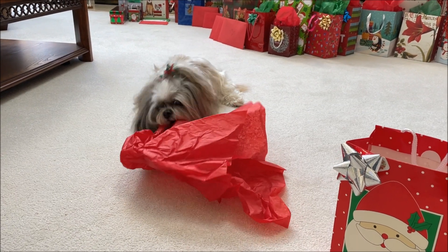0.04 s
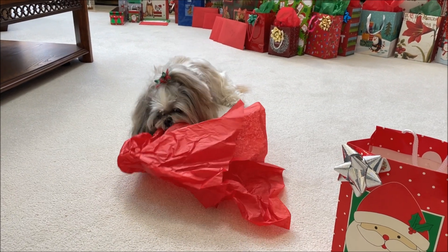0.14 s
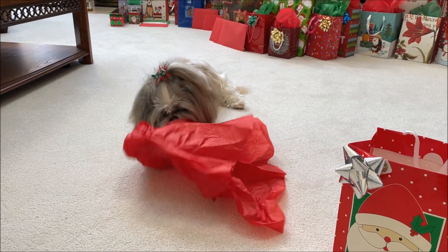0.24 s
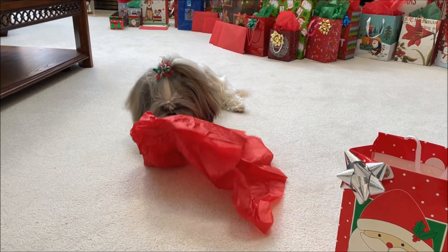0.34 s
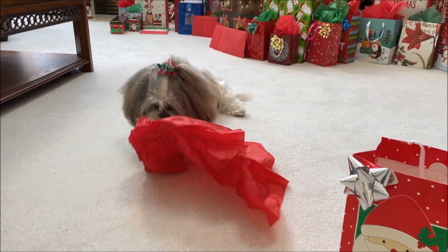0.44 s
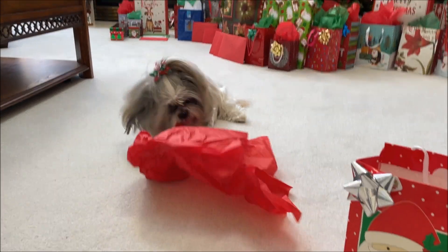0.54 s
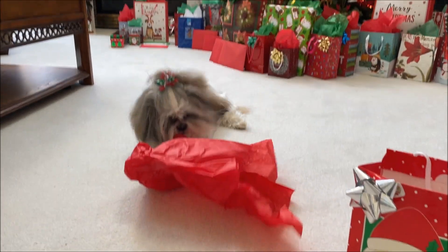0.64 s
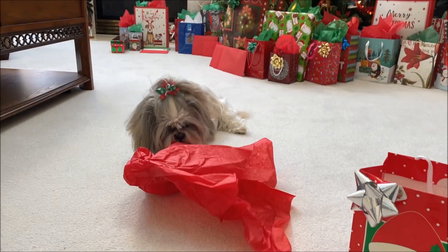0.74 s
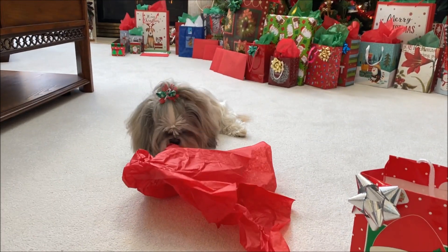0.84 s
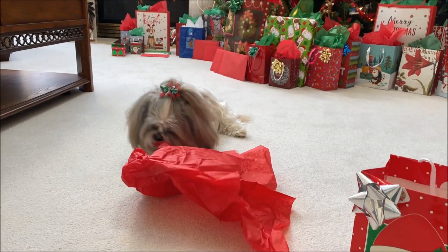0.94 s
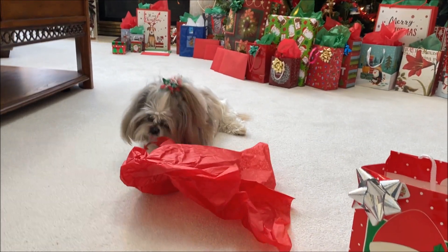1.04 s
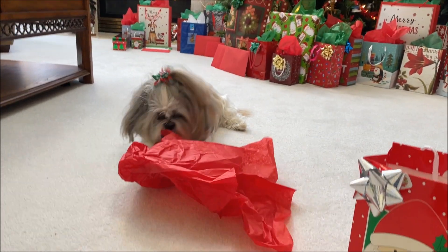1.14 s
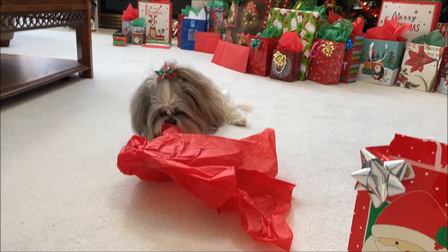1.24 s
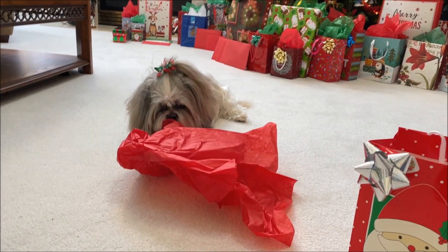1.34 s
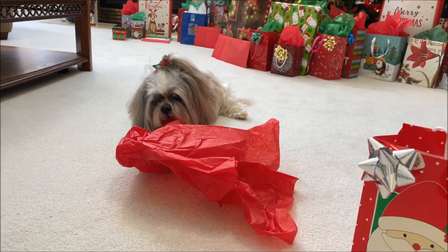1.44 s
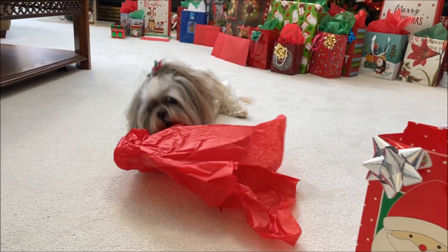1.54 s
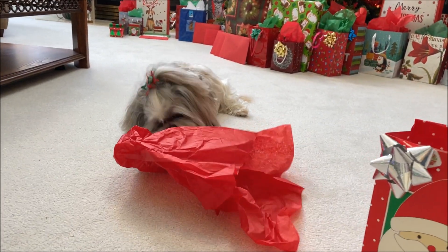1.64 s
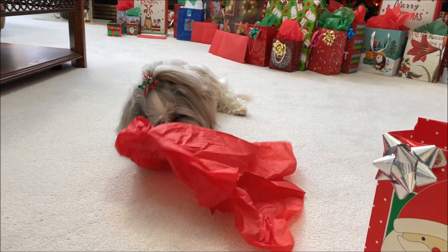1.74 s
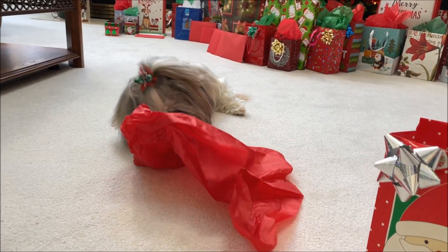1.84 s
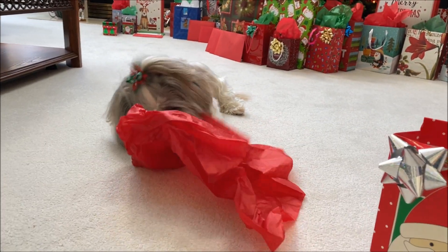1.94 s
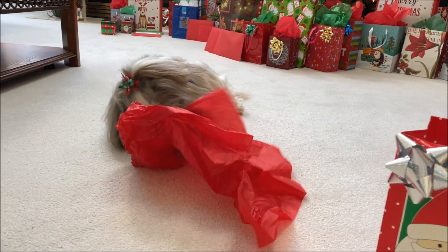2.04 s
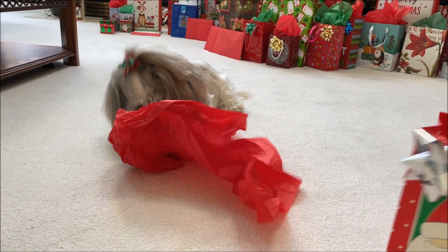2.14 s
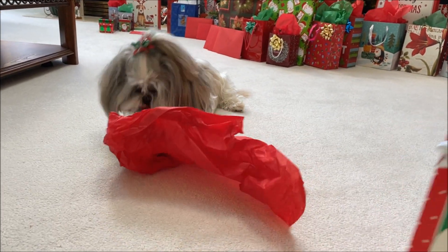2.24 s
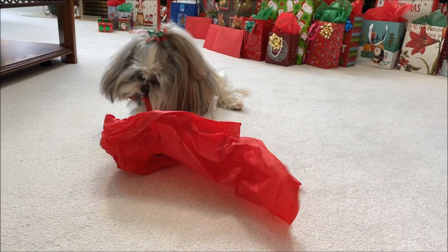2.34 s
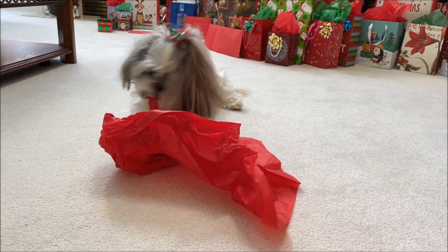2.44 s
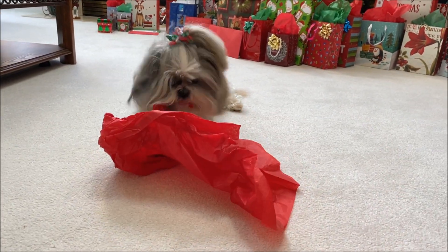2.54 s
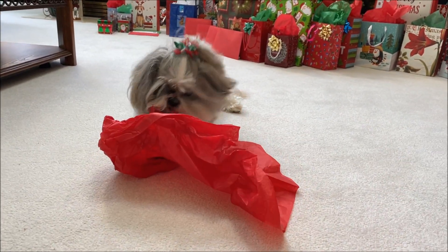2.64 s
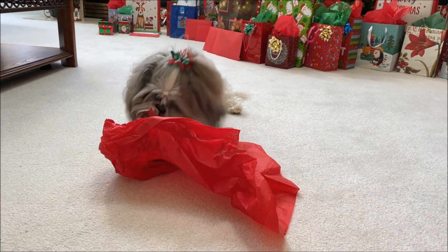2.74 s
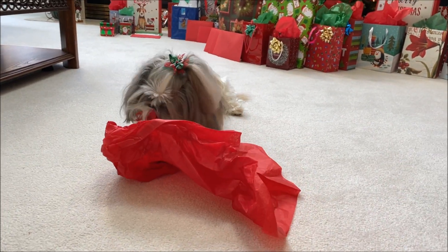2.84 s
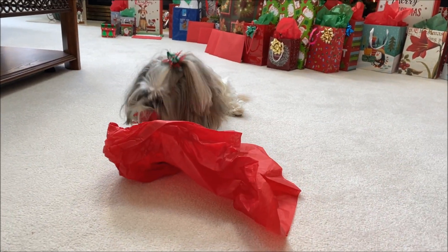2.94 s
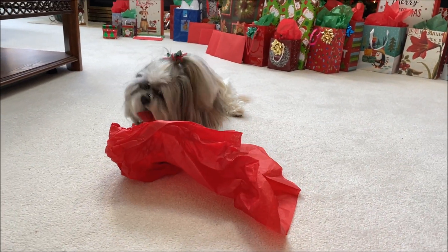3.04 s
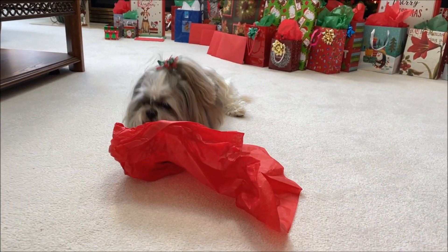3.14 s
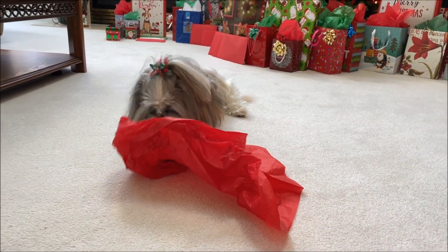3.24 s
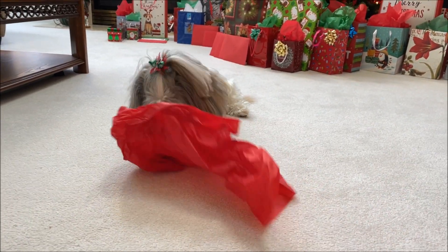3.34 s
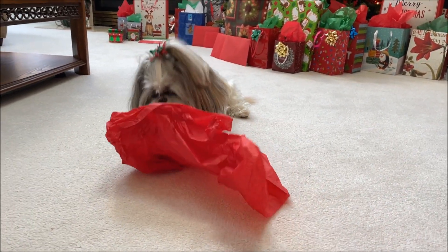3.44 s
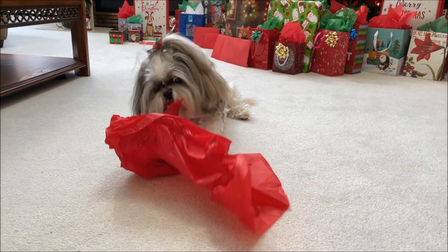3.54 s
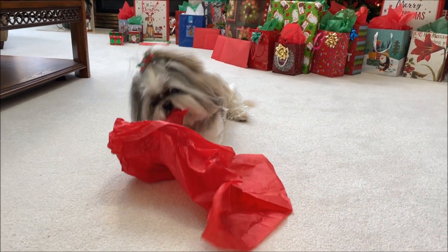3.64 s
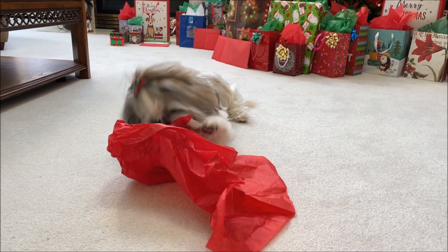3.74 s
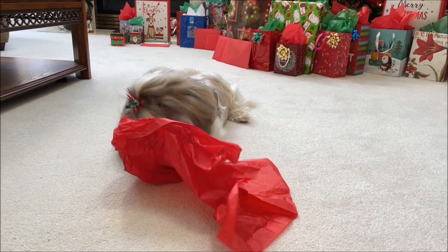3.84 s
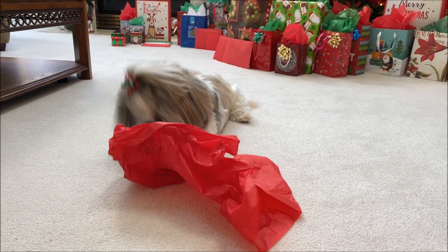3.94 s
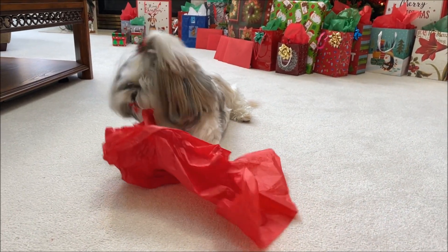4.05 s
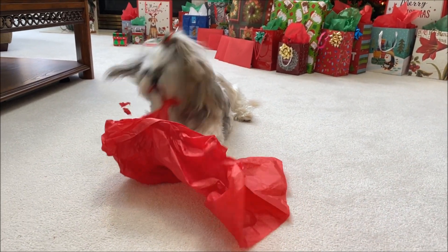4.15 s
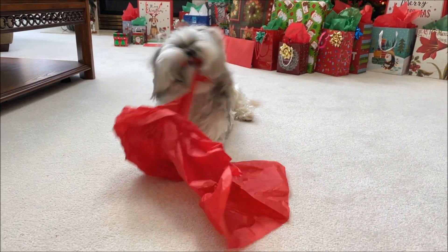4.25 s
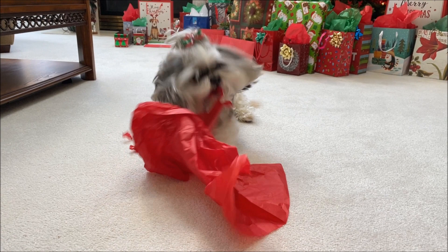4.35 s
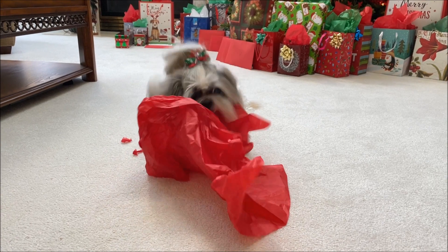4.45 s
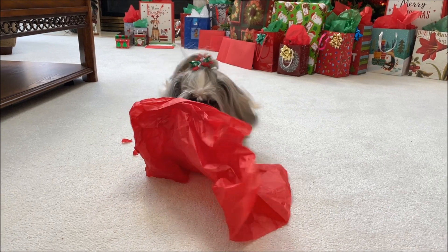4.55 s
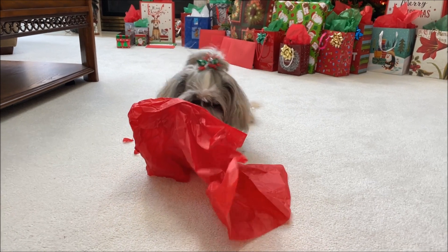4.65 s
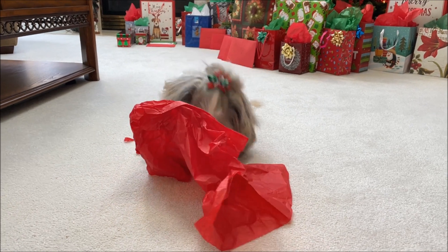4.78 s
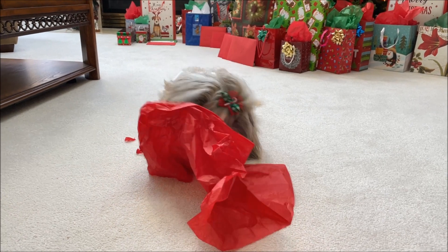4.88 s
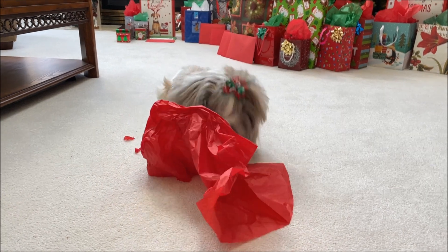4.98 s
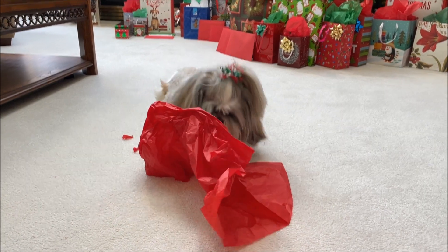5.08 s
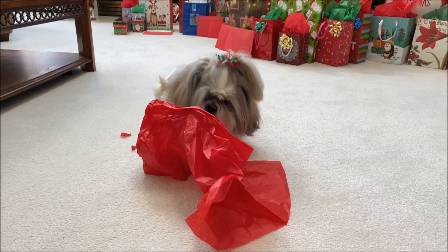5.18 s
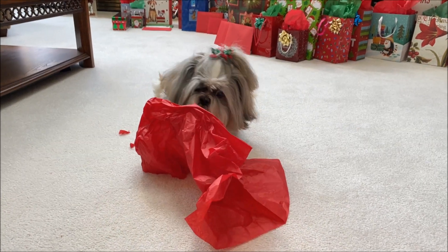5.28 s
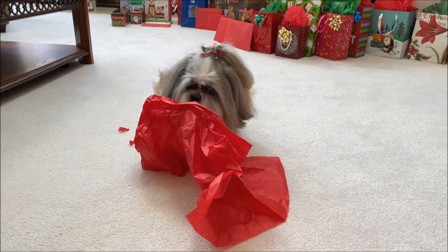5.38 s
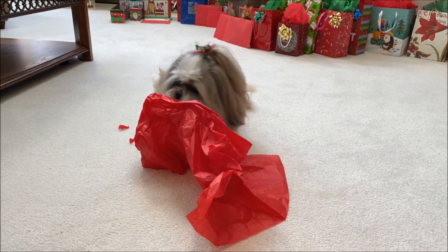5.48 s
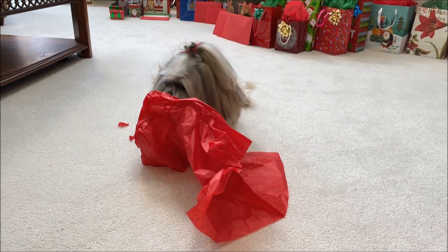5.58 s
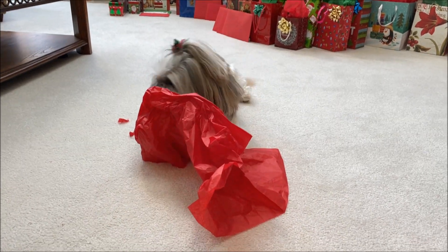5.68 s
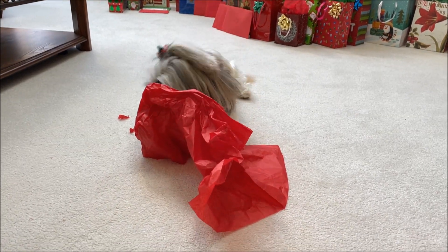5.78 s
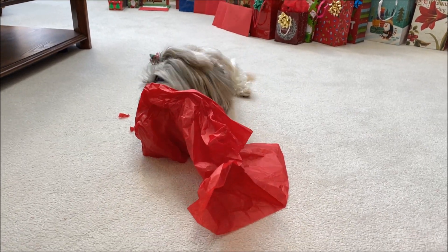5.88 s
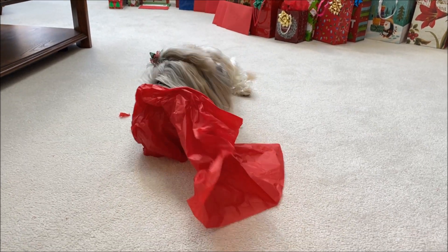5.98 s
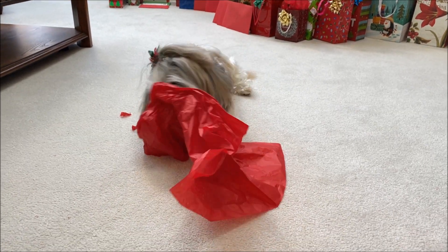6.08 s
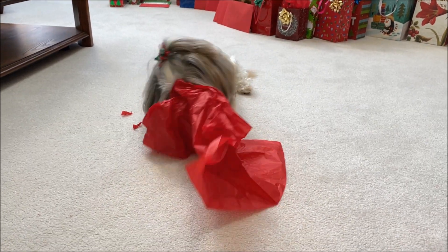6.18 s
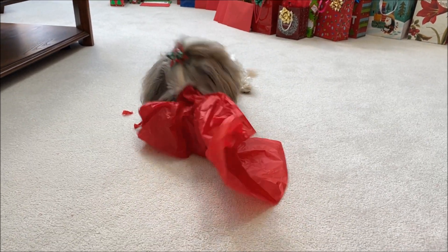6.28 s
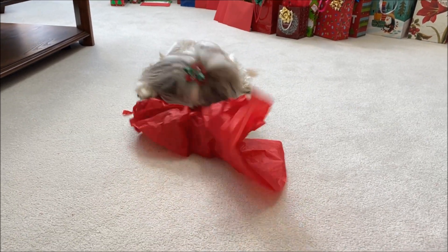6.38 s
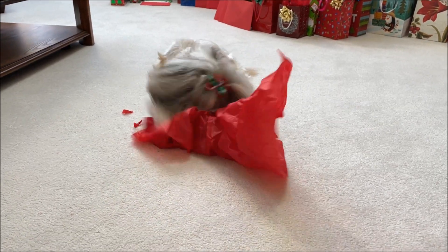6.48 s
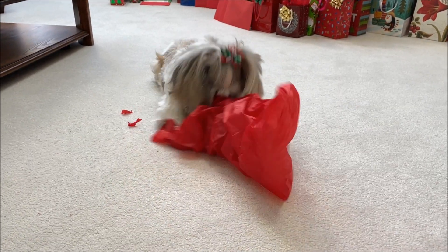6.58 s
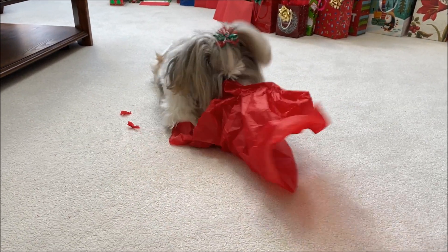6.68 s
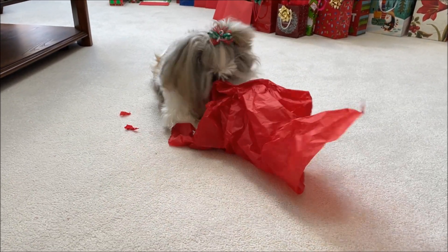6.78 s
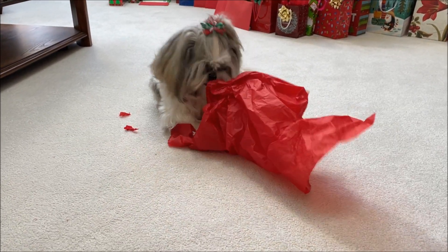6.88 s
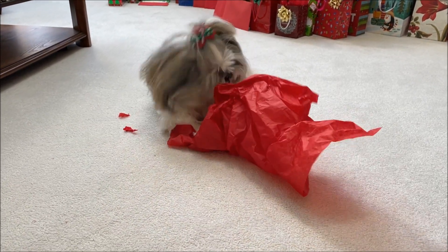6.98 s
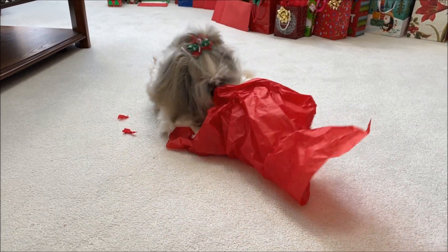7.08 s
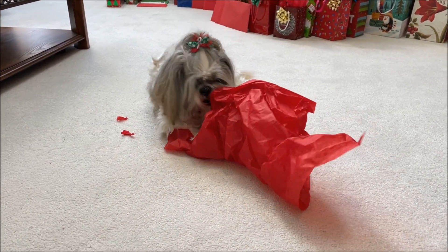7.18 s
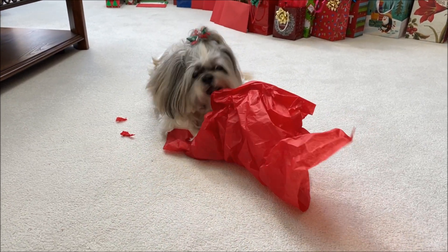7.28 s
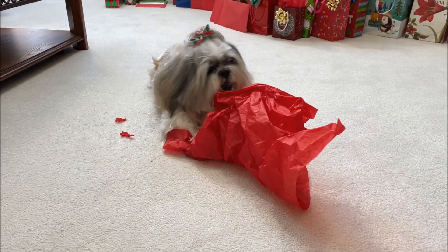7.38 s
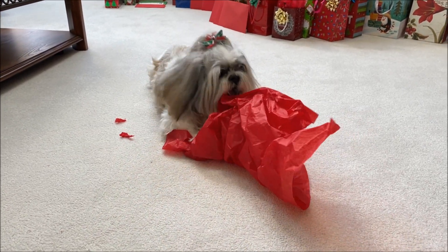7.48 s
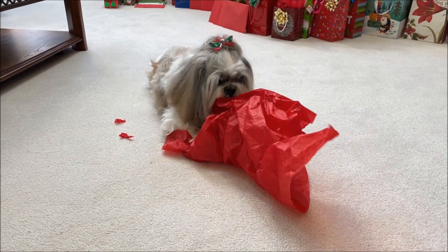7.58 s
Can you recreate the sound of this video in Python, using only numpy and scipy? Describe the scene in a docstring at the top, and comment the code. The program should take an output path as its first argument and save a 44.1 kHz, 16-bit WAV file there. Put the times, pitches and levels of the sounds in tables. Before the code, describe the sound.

Thin tissue paper rustles, snaps and tears as a little dog jerks it about indoors, a stiff gift bag bumping briefly off to the right.

```python
"""Small dog tearing tissue paper

Living room, carpeted floor: a small dog lies mouthing, tugging and tearing a sheet of tissue paper.
Random clicks make the creases that buckle in dense swarms and the single folds that snap; falling
low chirps make the jerked sheet flap, and one soft paw thump. A paper gift bag, bumped off to the
right, is a set of decaying sines. Low rumble and a faint mains hum lie below. Two closely spaced
microphones listen.
"""
import sys
import numpy as np
from scipy import signal
from scipy.fft import rfft, irfft, next_fast_len
from scipy.io import wavfile

SR = 44100
rng = np.random.default_rng(int(sys.argv[2]) if len(sys.argv) > 2 else 0)


def master(y):
    """Save y as 16-bit WAV."""
    cut = np.clip(np.atleast_2d(y).T, -1, 1)
    pcm = np.round(cut * 32767)  # scale
    wavfile.write(sys.argv[1], SR, pcm.astype(np.int16))


N = 336042
TIME = np.arange(N) / SR
SIZE = next_fast_len(N + SR // 2)    # room for filter tails
BINS_HZ = np.maximum(np.arange(SIZE // 2 + 1) * SR / SIZE, 1)

# Quiet room, relative spectrum: pitch_hz [Hz], level_db [dB per Hz]
ROOM_SPECTRUM = [(20, -2), (35, -23), (55, 7.5), (110, -5), (170, -8), (300, -16.5), (600, -38.5),
                 (2000, -28.5), (15000, -46.5)]
ROOM_TONE_DB = -66    # gain of the coloured air noise
# Mains hum, before its slow waver: pitch_hz [Hz], level_db [dB rms]
HUM = [(59.6, -81.5), (119.2, -69.5), (300.5, -83)]

# The dog pulls or kneads the sheet: start_s of the hold [s], hold_s [s], crackle_db [dB],
# swish_db of the whole sheet [dB re crackle], pocket_db of the crumpled hollow [dB re crackle]
PULLS = [(0.174, .11, -53.5, -7.5, -3.5), (0.382, .14, -47.5, -6.5, -19), (0.57, .09, -59, -20, -9),
         (0.884, 0.12, -69, -10, -11), (1.08, .17, -64.5, -6.5, -9), (1.644, 0.19, -53, -7.5, -15),
         (1.922, 0.093, -51.5, -9, -15), (2.128, 0.026, -45.5, -11, -12), (2.272, 0.11, -45, -5.5, -21.5),
         (2.654, 0.079, -62, -11, -14), (2.843, 0.037, -67, -1.5, -26), (3.252, 0.02, -62, -8.5, -11),
         (3.325, .015, -57.5, -10.5, -1), (3.407, 0.14, -49, -7.5, -14), (3.574, 0.096, -44.5, -8, -13),
         (3.718, 0.21, -53, -9, -15), (4.07, 0.18, -50.5, -9.5, -15), (4.448, 0.14, -45, -11.5, -19),
         (4.687, 0.04, -47, -9.5, -8.5), (4.955, 0.23, -51.5, -9, -12), (5.892, 0.16, -63, -7.5, -9),
         (6.222, 0.22, -47.5, -8.5, -10), (6.464, 0.36, -43.5, -9.5, -9), (6.95, 0.12, -42.5, -11, -5.5),
         (7.188, 0.074, -50.5, -14.5, -23), (7.318, 0.1, -76.5, 8, 7)]
PULL_RISE_DB_PER_S, PULL_FALL_DB_PER_S = 213, 183
# let go, the creases go on relaxing: level re the pull, and its fall
SETTLE_DB, SETTLE_DB_PER_S = -7, 54
# Quick jerks of the head: peak_s [s], crackle_db [dB], half_width_s [s],
# swish_db [dB re crackle], pocket_db [dB re crackle]
JERKS = [(0.44, -39.5, 0.013, -17, -31), (0.957, -65, 0.0064, -6, 6), (2.272, -38, 0.025, -11.5, -11),
         (2.432, -41.5, 0.023, -7, -14), (3.633, -42, 0.022, -12.5, -25), (4.014, -39, 0.015, -11, -19.5),
         (4.183, -40, 0.036, -11.5, -25), (4.354, -32.5, 0.033, -13.5, -13),
         (5.074, -36.5, 0.038, -8, -13.5), (6.117, -45.5, 0.023, -9, -1.5), (6.659, -38, 0.026, -11.5, -12),
         (6.854, -40, 0.014, -7, -7.5)]
JERK_EDGE_DB = 12    # fall per half width far out on the flanks
# faint crackle of the paper lying in the mouth; swish and pocket in dB re crackle
IDLE_DB, IDLE_SWISH_DB, IDLE_POCKET_DB = -78, -7, -11
# The sheet rips in jerks: time_s [s], depth_db of the stick-slip, top to bottom [dB]
RIP = [(6.88, 0), (6.93, 9), (7.07, 9), (7.12, 0)]
# Treble shelf above about 9 kHz, before its flicker: time_s [s], level_db [dB]
TREBLE = [(0, 10.5), (.45, -2.5), (.7, 0), (1.0, 3.5), (2.1, -1.5), (2.7, 1.5), (3.1, 7.5), (3.8, -4.5),
          (4.4, 1.5), (5.06, 0.5), (5.5, -10), (6.1, -0.5), (6.9, -6.5), (7.6, 6.5)]

# Relative spectra of the paper: pitch_hz [Hz], level_db [dB per Hz]
# buckling creases
CRACKLE_SPECTRUM = [(300, -48.5), (1200, -9.5), (2000, -5), (3300, -2), (5600, -5.5), (7000, -3),
                    (8500, -3), (10000, -1), (12500, -7), (15400, -7.5)]
# the whole sheet shaken: pitch_hz [Hz], level_db [dB per Hz]
SWISH_SPECTRUM = [(40, -16.5), (80, -0.5), (140, 1), (250, -0.5), (450, 1.5), (1000, -2), (1450, -6.5),
                  (2200, -7), (6000, -72)]
# the hollow pocket in the crumpled sheet: pitch_hz [Hz], level_db [dB per Hz]
POCKET_SPECTRUM = [(800, -23.5), (1500, -6.5), (1900, -1.5), (2250, -2.5), (2900, -19.5), (6000, -34)]
# a fold popping through: pitch_hz [Hz], level_db [dB per Hz]
SNAP_SPECTRUM = [(200, 11.5), (1000, 7.5), (2500, 14), (6000, 11), (9000, 14), (15000, 11)]

# Large folds that snap: start_s [s], level_db of the click before pop gain and colour [dB]
SNAPS = [(0.033, -48), (0.4145, -26.5), (0.814, -48), (0.837, -45), (0.952, -45), (1.315, -43),
         (1.3665, -46.5), (1.505, -55.5), (1.609, -46), (1.6555, -40), (1.8725, -38.5), (2.1667, -35),
         (2.4285, -30), (2.603, -40), (2.763, -45), (3.016, -49), (3.074, -49), (3.2131, -51), (3.948, -40),
         (5.341, -49), (5.711, -49), (5.838, -55), (5.916, -42.5), (6.079, -39), (6.85, -31), (6.941, -32),
         (6.9945, -30), (7.045, -27), (7.234, -39)]
# small folds snap at random: how many, and their middle level re the crackle, before pop gain
SMALL_SNAPS_PER_S, SMALL_SNAP_DB = 45, 1
# Falling low ripples: the sheet jerked taut and flapping; the one at 1.572 s a soft paw thump:
# time_s, just after the onset [s], level_db before trim [dB]
LOW_RIPPLES = [(0.426, -46), (1.572, -52.5), (1.969, -49.5), (4.016, -43.5), (4.334, -42), (4.72, -45.5),
               (7.274, -56)]

# Bumps of the gift bag: start_s [s], level_db before trim [dB], thump_db of the base [dB re level]
BUMPS = [(2.368, -24, -6), (2.395, -44, -2), (2.428, -36, -17), (2.4497, -16, -4.5), (2.602, -43, 7.5),
         (2.772, -33.5, -1), (2.778, -37, -5), (2.801, -35.5, -2), (5.475, -54.5, 4)]
# Stiff paper panels of the bag: pitch_hz [Hz], level_db [dB], t60_s [s]
BAG_PANELS = [(330, -13, 0.097), (670, -4, 0.039), (1000, -3.5, 0.042), (1280, 7.5, 0.012),
              (1360, -5.5, .009)]
# Base of the bag: pitch_hz [Hz], level_db [dB], t60_s [s]
BAG_BASE = [(103, -0.5, 0.1), (192, -9, 0.09)]

# Stereo image by pitch: pitch_hz [Hz], phase of right behind left [radians],
# share of the power alike on both sides [0-1], balance_db, left minus right [dB]
STEREO_IMAGE = [(100, .1, .88, 1.2), (500, .1, .74, 2), (1200, .3, .64, 1.3), (2200, 1.1, .65, -.8),
                (3600, 1.8, .55, 4.2), (5200, 1.1, .15, 5), (6500, -1.8, .4, .6), (8600, -3.1, .88, 0),
                (10000, -4.1, .76, 0), (12300, -5.5, .72, 0), (13500, -6.3, .94, 0), (15500, -6.5, .85, 0)]
CUTOFF_HZ = 15900


def from_db(db):
    """Decibels to gain."""
    return 10 ** (np.asarray(db) / 20)


def rms_one(x):
    """Scale to an rms of 1."""
    return x / np.sqrt(np.mean(x ** 2) + 1e-20)


def columns_at(rows, where):
    """Each column of a table, joined by straight lines."""
    first, *columns = np.transpose(rows)
    return [np.interp(where, first, column) for column in columns]


def colour(x, spectrum):
    """Causal (minimum-phase) filter of unit power gain that follows a short spectrum."""
    hz, level_db = np.transpose(spectrum)
    gain = rms_one(from_db(np.interp(np.log(BINS_HZ), np.log(hz), level_db)))
    cepstrum = irfft(np.log(gain), SIZE)
    # folding the cepstrum onto positive time makes the filter causal
    folded = cepstrum * (1 + np.sign(SIZE / 2 - np.arange(SIZE)))
    folded[0] = cepstrum[0]
    response = np.exp(rfft(folded))
    return irfft(rfft(x, SIZE) * response, SIZE)[..., :N]


def drift(rate):
    """Random wander of rms 1 that takes `rate` new values a second."""
    knots = rng.standard_normal(8192)
    return rms_one(np.interp(TIME * rate, np.arange(len(knots)), knots))


def clicks_at(times, level_db):
    """One click at each time."""
    out = np.zeros(N)
    places = np.clip(np.round(times * SR).astype(int), 0, N - 1)
    np.add.at(out, places, from_db(level_db))
    return out


def ring(clicks, hz, t60):
    """A resonance: a unit click sets a decaying sine of height 1 ringing."""
    radius = from_db(-60 / (t60 * SR))
    turn = 2 * np.pi * hz / SR
    poles = [1, -2 * radius * np.cos(turn), radius * radius]
    return signal.lfilter([0, np.sin(turn)], poles, clicks + 1e-18)


def scatter(x, early_t60, late_t60, late_db):
    """Diffuse sound per side: fresh noise for the echoes of every click, under a shared decay."""
    late_power = from_db(late_db) ** 2
    energy = 0
    for t60, weight in (early_t60, 1), (late_t60, late_power):
        keep = from_db(-120 / (t60 * SR))    # 60 dB in energy over t60
        energy = energy + weight * signal.lfilter([1 - keep], [1, -keep], x ** 2 + 1e-18)
    return np.sqrt(energy / (1 + late_power)) * rng.standard_normal((2, N))


def radiate(clicks, spectrum):
    """Clicks take on the paper's colour; rows: direct sound, scattered left, scattered right."""
    echoes = scatter(clicks, early_t60=.012, late_t60=.3, late_db=-6)
    return colour(np.vstack([clicks, echoes]), spectrum)


def room_tone(apart=0.57):
    """Low ventilation rumble, nearly alike on both sides, and a wavering mains hum."""
    air = rng.standard_normal(N) + apart * rng.standard_normal((2, N))
    hum = 0
    for hz, level_db in HUM:
        height = np.sqrt(2) * from_db(level_db + 0.7 * drift(3.2))
        hum = hum + height * np.sin(2 * np.pi * hz * TIME + 0.18 * drift(6.5))
    return from_db(ROOM_TONE_DB) * colour(air, ROOM_SPECTRUM) + hum


def handling():
    """Crackle, swish and pocket in dB: pulls rise, hold, fall, settle; jerks peak; powers add."""
    t = TIME[::40]
    moves = [(np.full(len(t), IDLE_DB), IDLE_SWISH_DB, IDLE_POCKET_DB)]
    for start, hold, level_db, swish_db, pocket_db in PULLS:
        before = np.maximum(start - t, 0)
        after = np.maximum(t - start - hold, 0)
        release_db = np.maximum(-PULL_FALL_DB_PER_S * after, SETTLE_DB - SETTLE_DB_PER_S * after)
        shape_db = level_db - PULL_RISE_DB_PER_S * before + release_db
        moves.append((shape_db, swish_db, pocket_db))
    for peak, level_db, half_width, swish_db, pocket_db in JERKS:
        shape_db = level_db - JERK_EDGE_DB * (np.hypot(1, (t - peak) / half_width) - 1)
        moves.append((shape_db, swish_db, pocket_db))
    power = 0
    for shape_db, swish_db, pocket_db in moves:
        power = power + from_db(shape_db + np.array([[0], [swish_db], [pocket_db]])) ** 2
    return [np.interp(TIME, t, 10 * np.log10(p)) for p in power]


def stick_slip(slips_per_s=48, uneven=.3):
    """Tension builds until fibres part: each slip starts loud and dies away, from .5 to -.5."""
    gaps = np.exp(uneven * rng.standard_normal(1024)) / slips_per_s
    turns = np.interp(TIME, np.cumsum(gaps), np.arange(len(gaps)))
    return .5 - turns % 1


def buckling(per_s, spread_db, clump_db, clump_rate):
    """Creases give way at random, in little avalanches of uneven sizes. Rms 1."""
    sizes = from_db(spread_db * np.minimum(rng.exponential(1, N), 4.5)) * rng.choice([-1, 1], N)
    born = rng.random(N) < per_s / SR
    clumps = from_db(clump_db * drift(clump_rate))
    # denser swarms get smaller clicks, so the power stays even
    return rms_one(sizes * born / np.sqrt(per_s) * clumps)


def creases_ringing(clicks, ring_s=0.0025, count=13):
    """Each crease rings for a moment at one of several pitches, dealt at random. Rms 1."""
    dealt = rng.integers(0, count, N)
    pitches = np.linspace(1500, 15300, count)
    return rms_one(sum(ring(clicks * (dealt == k), hz, ring_s) for k, hz in enumerate(pitches)))


def rustle(crackle_db, swish_db, pocket_db):
    """Harder work buckles more creases; they also shake the sheet and its hollow pocket."""
    rip_db = columns_at(RIP, TIME)[0] * stick_slip()
    treble_db, = columns_at(TREBLE, TIME)
    per_s = 2300 * from_db(.3 * (crackle_db + rip_db + 48))

    creases = buckling(per_s, spread_db=1.5, clump_db=1.16, clump_rate=120)
    pings = creases_ringing(buckling(per_s, spread_db=2.0, clump_db=1.0, clump_rate=80))
    # smooth hiss of paper sliding on paper and fur
    fibres = .3 * rng.standard_normal(N)
    crackle_source = 0.86 * creases + .75 * pings + fibres
    crackle = radiate(from_db(crackle_db + rip_db) * crackle_source, CRACKLE_SPECTRUM)
    # tight little folds sound brighter than broad ones, and the mix keeps changing
    treble = signal.sosfilt(signal.butter(1, 9000, "high", fs=SR, output="sos"), crackle)
    flicker_db = 1.6 * drift(25) + 1.0 * drift(300)
    crackle = crackle + treble * (from_db(treble_db + flicker_db) - 1)

    folds = buckling(per_s / 2, spread_db=2.5, clump_db=1.5, clump_rate=140)
    swish_source = 0.73 * creases + 1.076 * folds
    swish = radiate(from_db(swish_db + rip_db) * swish_source, SWISH_SPECTRUM)

    wad = buckling(per_s / 2, spread_db=-1.0, clump_db=3.5, clump_rate=90)
    pocket = radiate(from_db(pocket_db + rip_db) * wad, POCKET_SPECTRUM)
    return crackle + swish + pocket


def snaps(crackle_db, pop_db=6, crumble_db=-6, crumble_s=.001):
    """A stiff fold pops through, then crumbles briefly; small folds go with the crackle."""
    times, level_db = np.transpose(SNAPS)
    born = rng.random(N) < SMALL_SNAPS_PER_S / SR
    small = born * from_db(crackle_db + SMALL_SNAP_DB + 2 * rng.standard_normal(N))
    pops = from_db(pop_db) * (clicks_at(times, level_db) + small)
    after = signal.lfilter([1], [1, -np.exp(-1 / (crumble_s * SR))], pops + 1e-18)
    crumble = from_db(crumble_db) * after * rng.standard_normal(N)
    return radiate(pops + crumble, SNAP_SPECTRUM)


def low_ripples(start_hz=750, end_hz=90, glide_s=0.02, rise_s=0.027, trim_db=-3, ragged=.8):
    """Flaps, as bending waves cross the sheet short ripples first, and a paw thump shaped alike."""
    t = TIME[:SR // 5]
    wave = np.zeros(N + len(t), complex)
    for (time_s, level_db), stretch in zip(LOW_RIPPLES, rng.standard_normal(len(LOW_RIPPLES))):
        glide_hz = end_hz + (start_hz - end_hz) * np.exp(-t / glide_s)
        hz = glide_hz * np.exp(0.128 * stretch)
        swell = (t / rise_s) ** 2 * np.exp(2 - 2 * t / rise_s)    # peaks at 1 after rise_s
        ripple = np.exp(2j * np.pi * np.cumsum(hz) / SR)
        at = max(round((time_s - .014) * SR), 0)    # begins 14 ms ahead of the listed time
        wave[at:at + len(t)] += from_db(level_db + trim_db) * swell * ripple
    # wrinkles make it ragged
    wrinkled = wave[:N] * np.exp(1j * ragged * drift(260))
    return np.real(wrinkled * (1 + .5 * drift(300)))


def gift_bag(panel_db=-5, base_db=-5, travel_s=0.0013, room_db=-10, left_late_s=0.00026):
    """Each bump rings the stiff paper panels and the base; low bending waves travel slower."""
    times, level_db, thump_db = np.transpose(BUMPS)
    out = np.zeros(N)
    panel_blow_db = level_db + panel_db
    base_blow_db = level_db + thump_db + base_db
    for modes, blow_db in (BAG_PANELS, panel_blow_db), (BAG_BASE, base_blow_db):
        for hz, mode_db, t60 in modes:
            uneven_db = 1.5 * rng.standard_normal(len(times))
            delay = travel_s * np.sqrt(1000 / hz)    # travel_s holds at 1 kHz
            out += ring(clicks_at(times + delay, blow_db + mode_db + uneven_db), hz, t60)
    out = signal.sosfilt(signal.butter(2, 65, "high", fs=SR, output="sos"), out)
    # carpet softens the contact
    out = signal.sosfilt(signal.butter(5, 1850, fs=SR, output="sos"), out)
    echoes = scatter(out, early_t60=0.018, late_t60=0.5, late_db=-13)
    # relative spectrum of the echoes: Hz, dB per Hz
    room = colour(echoes, [(40, -31), (90, -8), (250, -1.5), (1300, -3), (1900, -26), (5000, -70)])
    # the right port is nearer: earlier and louder
    sides = np.array([np.interp(TIME - left_late_s, TIME, out), out])
    return (sides + from_db(room_db) * room) * from_db(np.array([[-1], [1]]) * 0.68)


def stereo_image(direct, diffuse):
    """At each pitch, mix sound alike on both sides, turned in phase, with sound unrelated there."""
    phase, share_alike, balance_db = columns_at(STEREO_IMAGE, BINS_HZ)
    alike = rfft(direct, SIZE) * np.exp(-1j * phase * np.array([[0], [1]]))
    both = np.sqrt(share_alike) * alike + np.sqrt(1 - share_alike) * rfft(diffuse, SIZE)
    balance = from_db(balance_db / 2 * np.array([[1], [-1]]))
    return irfft(both * balance, SIZE)[:, :N]


def scene():
    """The tissue paper in front, the bag to the right, the room all round."""
    room = room_tone()
    crackle_db, swish_db, pocket_db = handling()
    paper = rustle(crackle_db, swish_db, pocket_db) + snaps(crackle_db)
    front = stereo_image(paper[0] + low_ripples(), paper[1:])
    return front + gift_bag() + room


def record(dry):
    """A steep elliptic low-pass cuts the top."""
    return signal.sosfilt(signal.ellip(12, .1, 80, CUTOFF_HZ, fs=SR, output="sos"), dry)


dry = scene()
out = record(dry)
master(out)
```